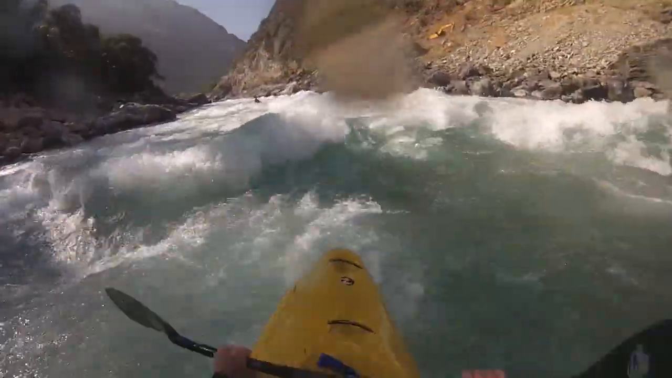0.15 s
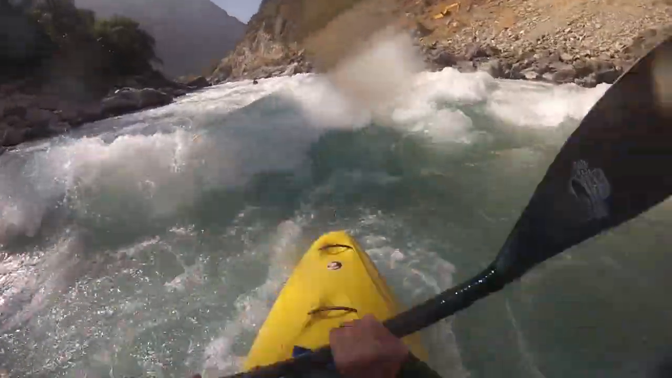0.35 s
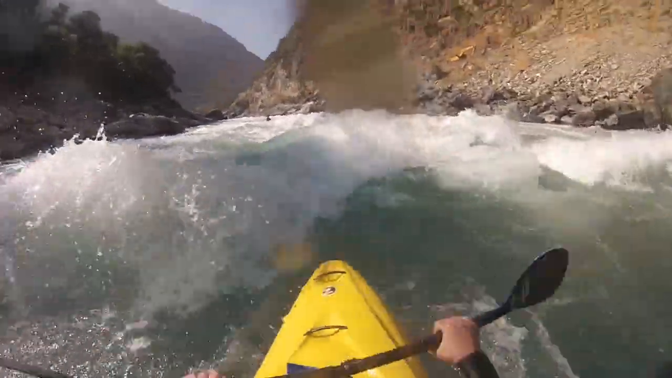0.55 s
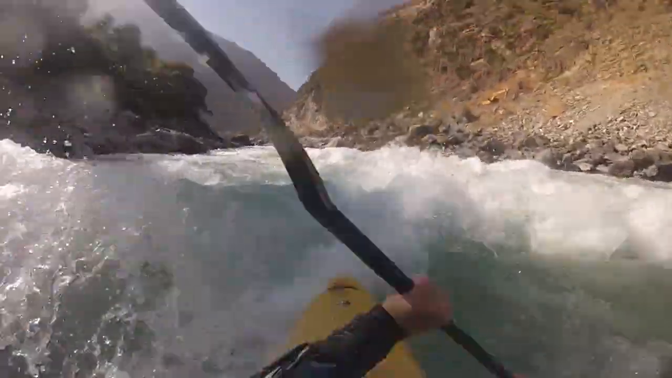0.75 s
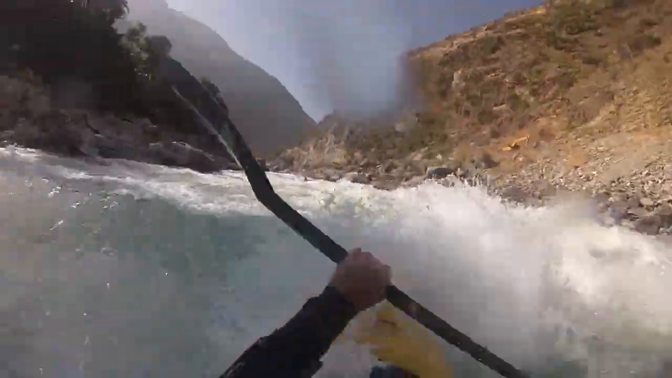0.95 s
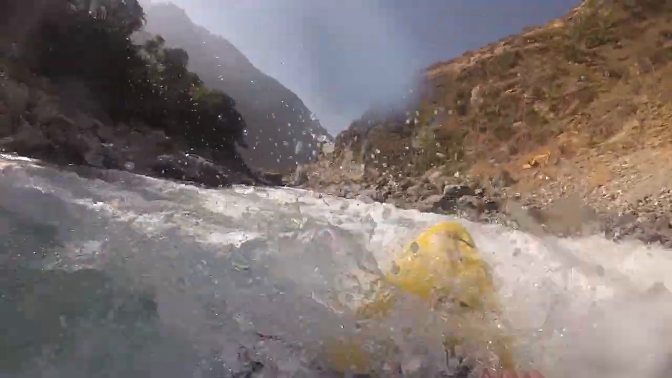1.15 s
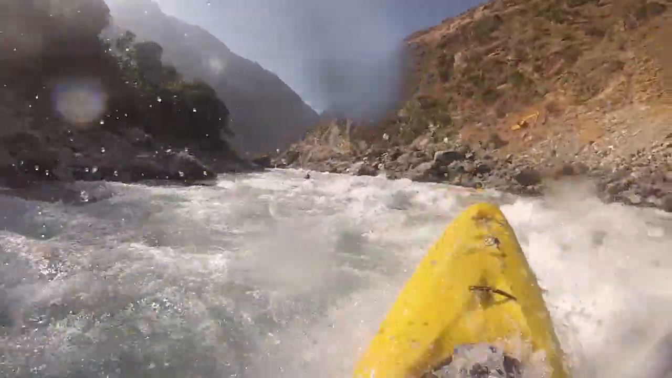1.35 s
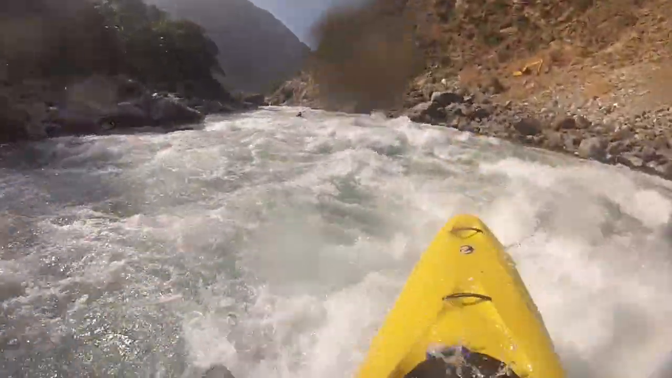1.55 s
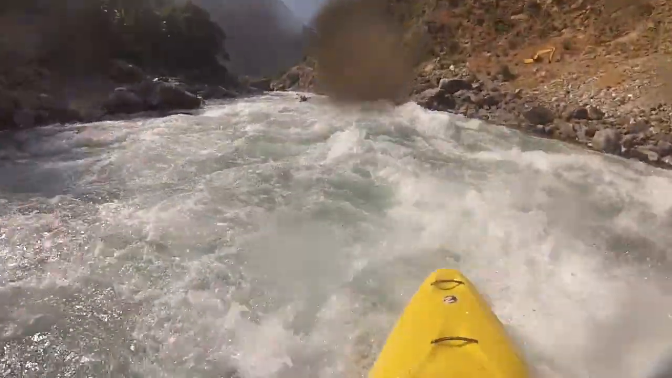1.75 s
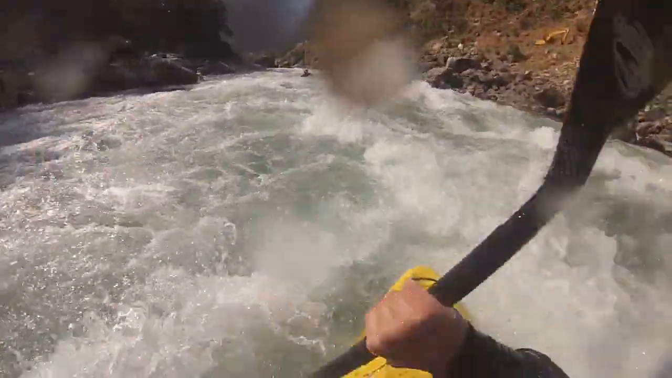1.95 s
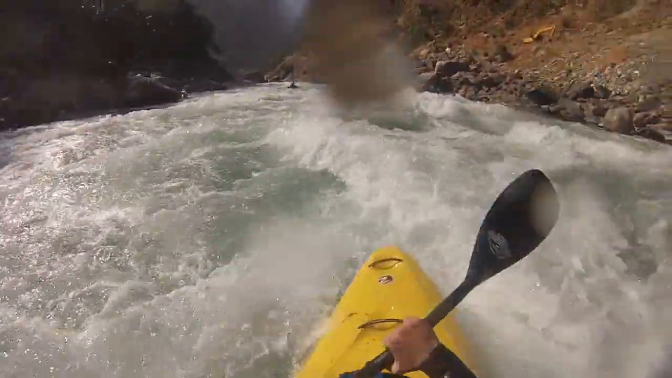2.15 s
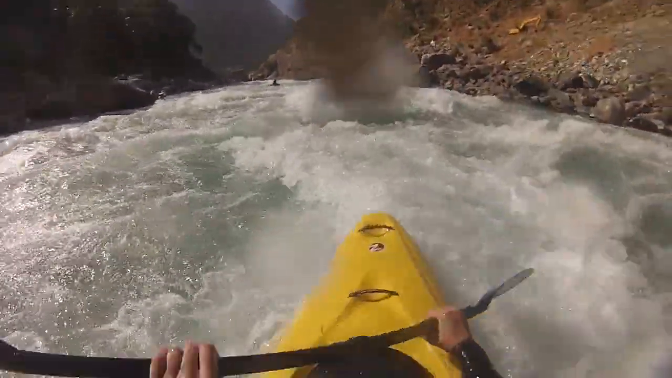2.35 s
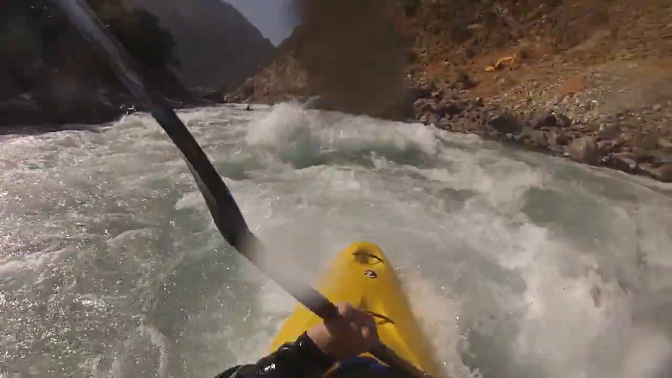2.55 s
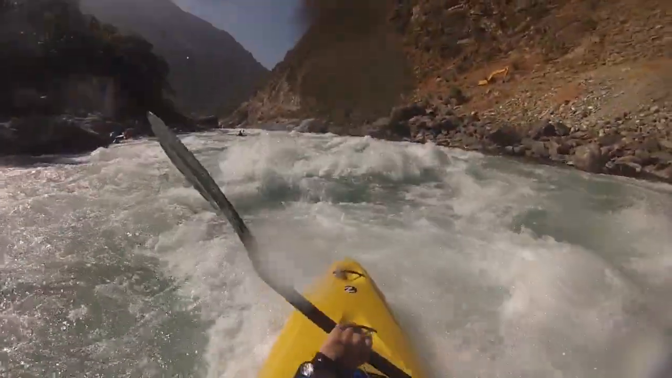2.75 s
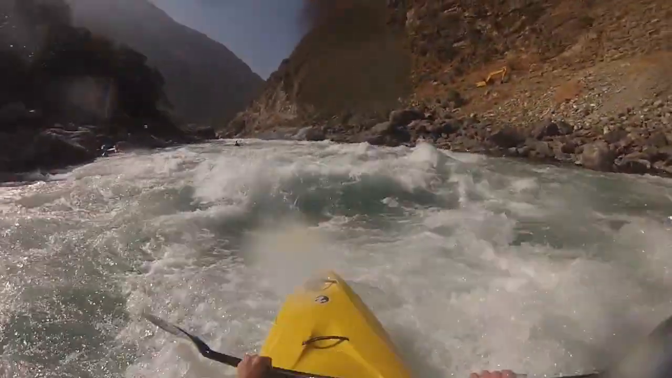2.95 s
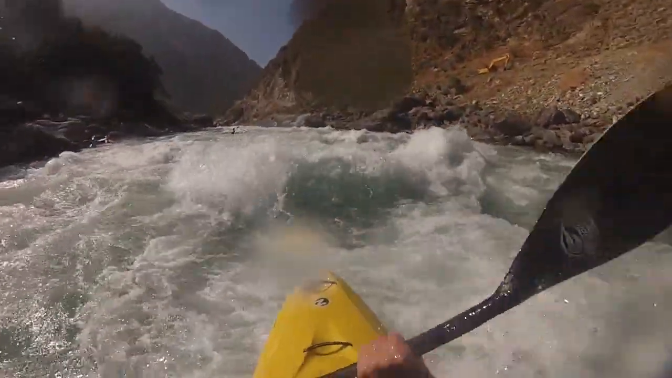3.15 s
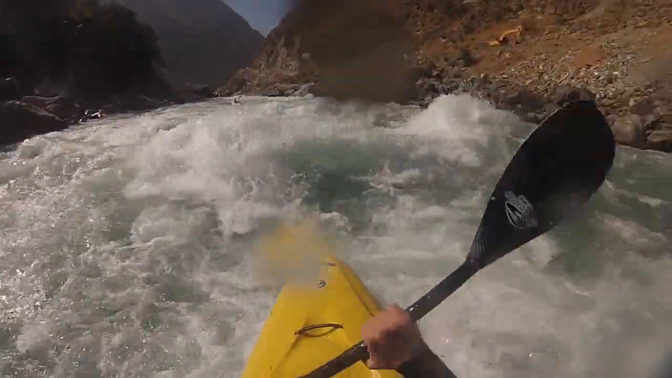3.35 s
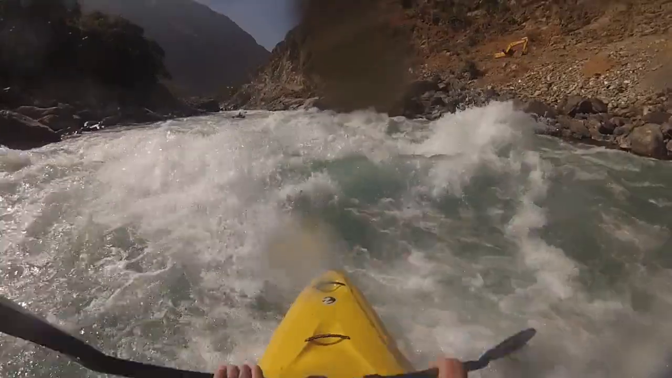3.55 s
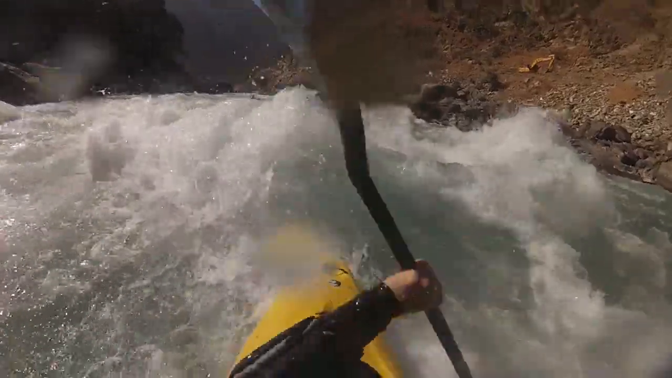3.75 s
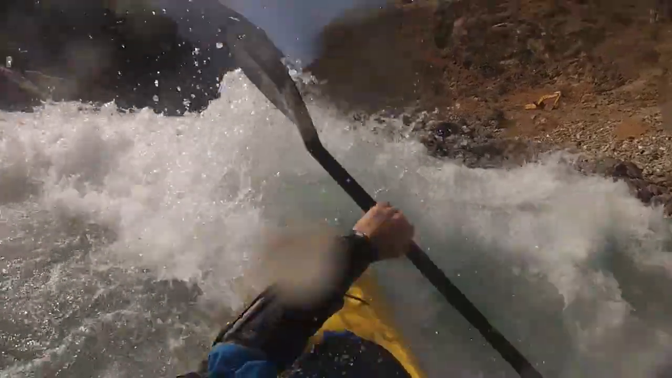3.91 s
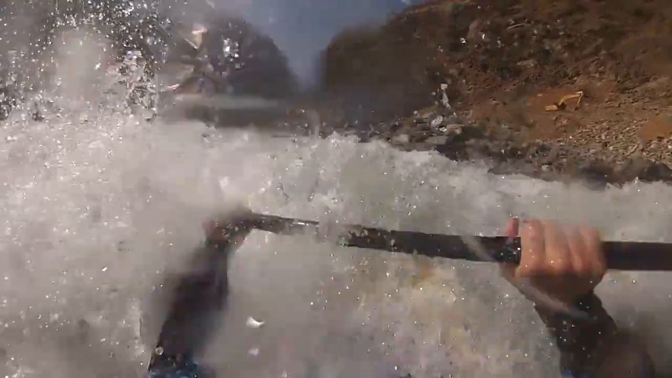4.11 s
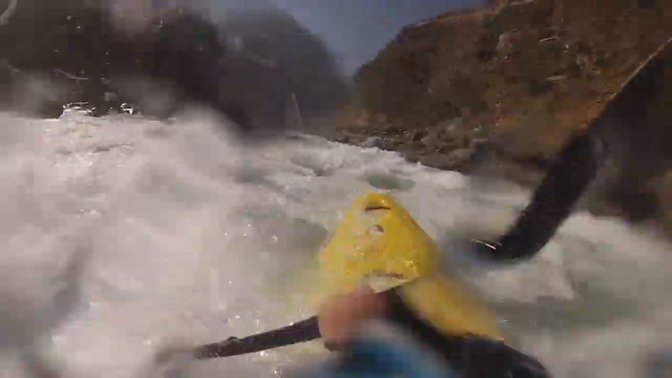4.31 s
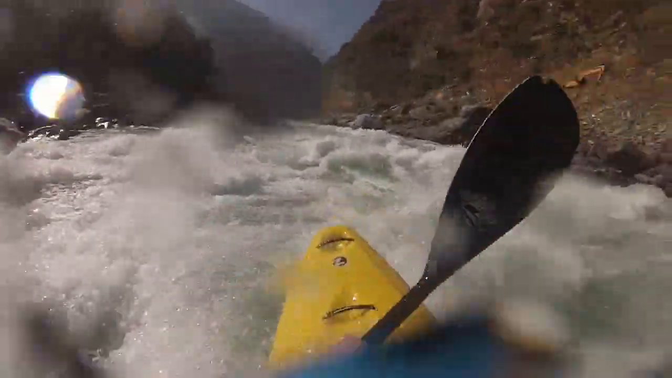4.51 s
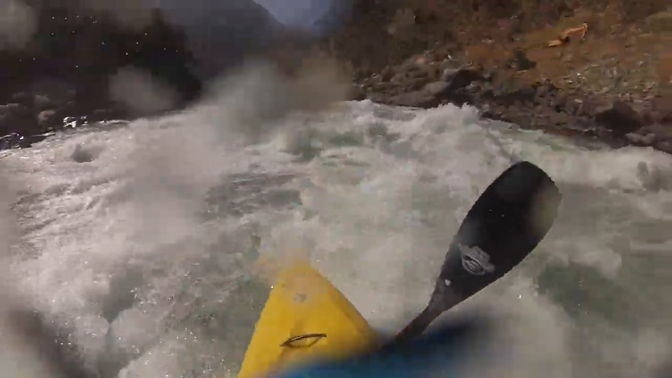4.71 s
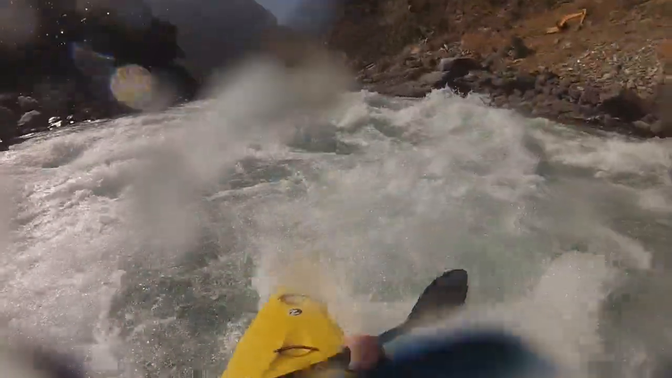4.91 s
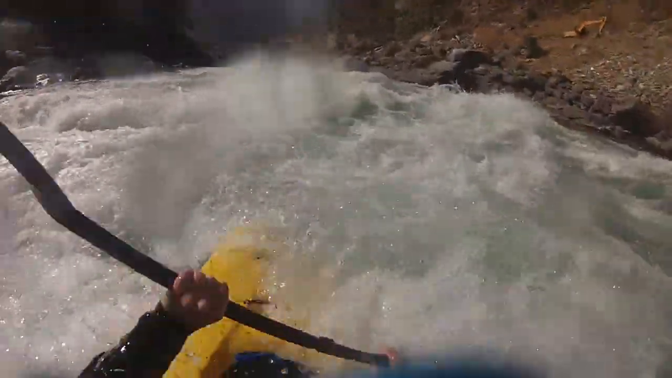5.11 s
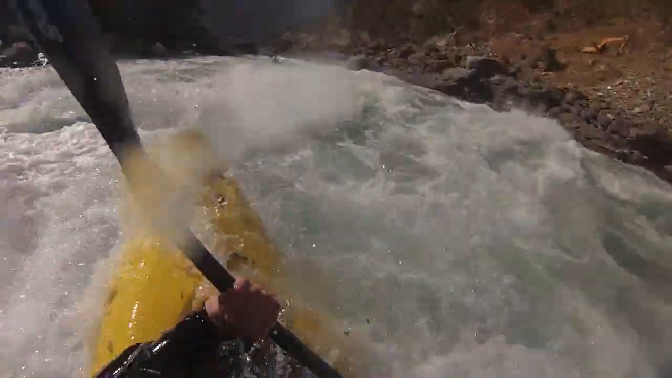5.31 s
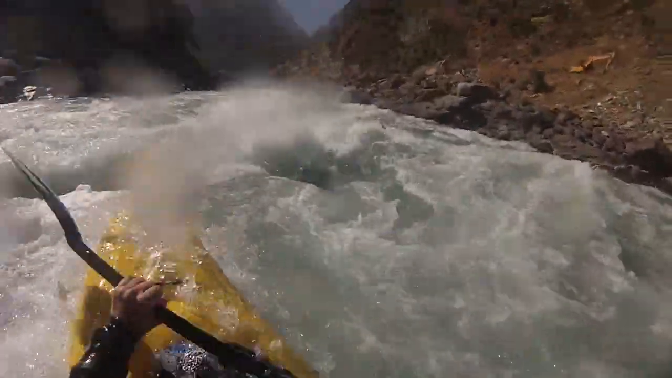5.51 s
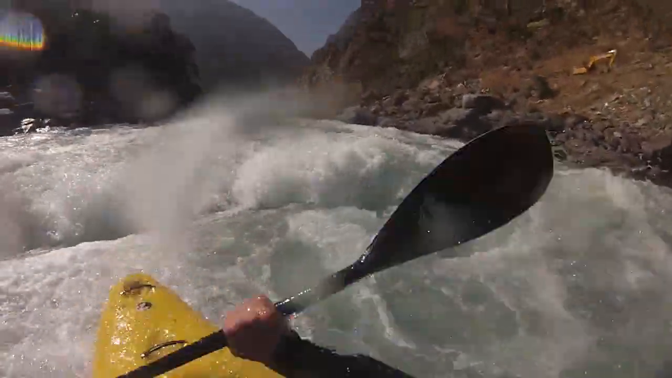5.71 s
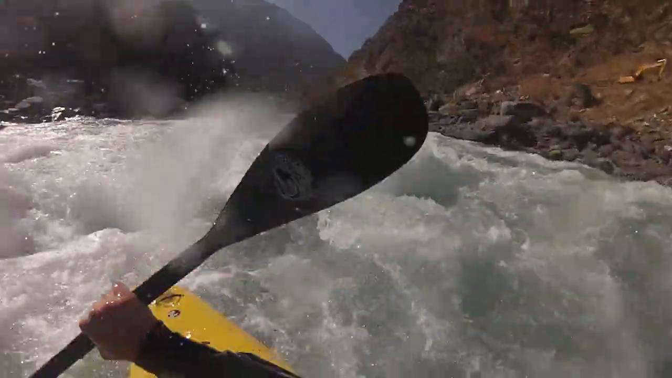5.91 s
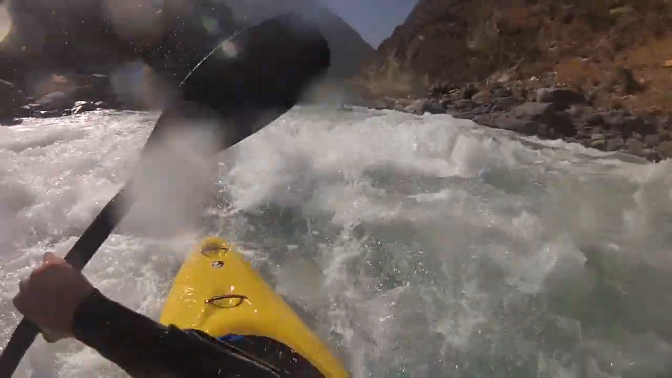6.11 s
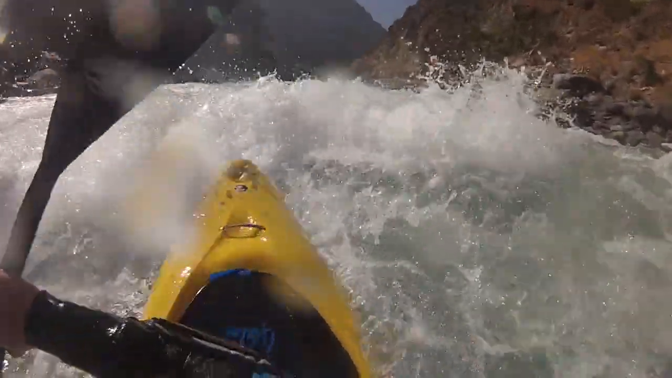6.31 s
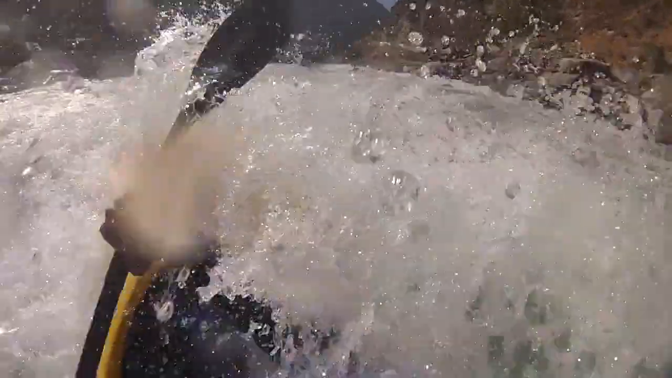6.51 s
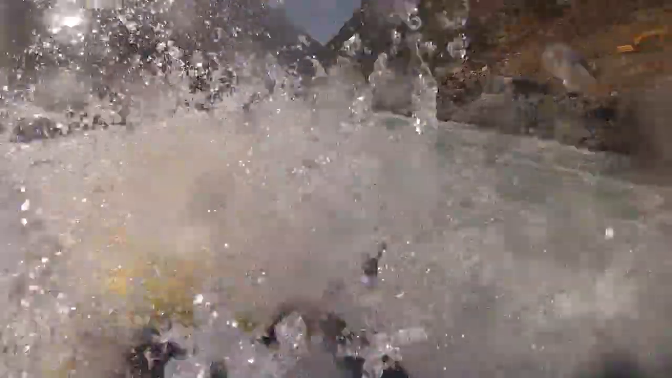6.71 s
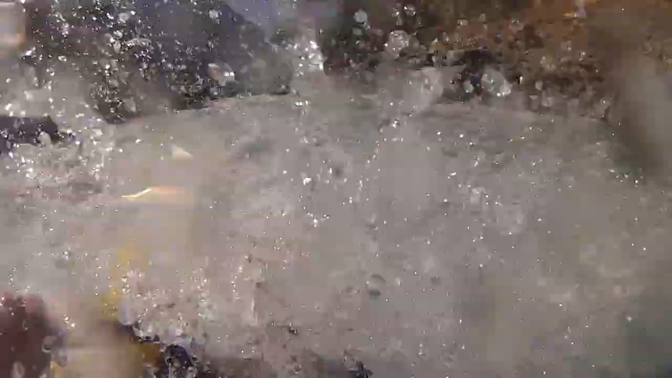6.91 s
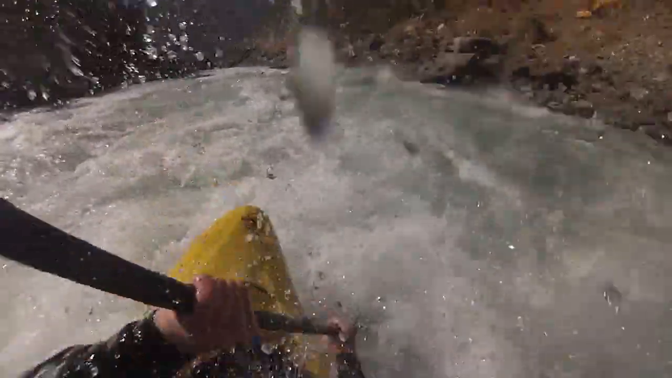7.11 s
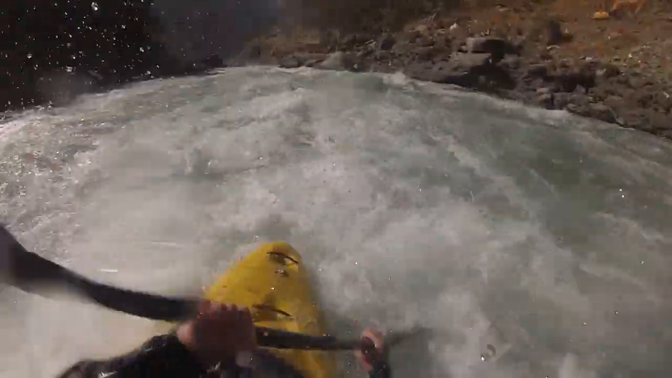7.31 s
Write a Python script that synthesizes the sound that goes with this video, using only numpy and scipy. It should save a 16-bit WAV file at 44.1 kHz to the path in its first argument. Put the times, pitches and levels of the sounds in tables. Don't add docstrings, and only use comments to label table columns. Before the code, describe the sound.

Continuous rushing river with hissing foam and gurgling churn, coloured by the hollow resonance of a waterproof case. Stray drops tick on the plastic shell early on; a wave slaps hard just after four seconds with rattling clacks. After a calmer stretch, bigger hits at six and a half and seven seconds boom against the helmet and crackle with spray, then the roar eases. Close, almost centred, outdoors in a gorge.

```python
import sys
import numpy as np
from scipy import signal
from scipy.fft import rfft, irfft, next_fast_len
from scipy.io import wavfile
from scipy.ndimage import uniform_filter1d

SR = 44100
rng = np.random.default_rng(int(sys.argv[2]) if len(sys.argv) > 2 else 0)


def transcribe(signal):
    frames = np.atleast_2d(signal).T
    limited = np.clip(frames, -1, 1)
    pcm = np.round(limited * 32767).astype(np.int16)
    wavfile.write(sys.argv[1], SR, pcm)


def how_loud(loudness_db):
    steps = np.asarray(loudness_db, float) / 20
    return 10 ** steps


N = 328986

# [t/s, nearness of breaking crests/dB, churn of aerated water under the hull/dB]
WATER_MOODS = [(0.1, -4.5, -4.5), (0.95, 7, 1), (1.2, 3, 4.5), (2.08, -1, 2.5), (2.51, -2, -1.5),
               (3.16, -3.5, -2.5), (3.45, 0, -2), (3.74, -1, -5), (4.07, 4, 1.5), (4.2, 12, 7),
               (4.4, 2, 2.5), (5.0, -1.5, 0), (5.3, 0.5, 2), (5.6, -2, -2), (6.19, 0, 0.5), (6.56, 6.5, 3),
               (6.72, 3, 2), (7.46, -2, -1)]


def rms_one(x):
    return x / np.sqrt(np.mean(x ** 2) + 1e-20)


def band(x, low_hz, high_hz, order=2):
    return signal.sosfilt(signal.butter(order, [low_hz, high_hz], "band", fs=SR, output="sos"), x)


def add(out, s, piece):
    at = round(s * SR)
    out[at:at + len(piece)] += piece[:N - at]


def water_moods():
    s, crest_db, churn_db = np.transpose(WATER_MOODS)
    t = np.arange(N) / SR
    return np.interp(t, s, crest_db), np.interp(t, s, churn_db)


def drift(rate):
    r = np.exp(-80 * np.pi * rate / SR)
    slow = signal.lfilter([1], [1, -2 * r, r * r], rng.standard_normal(N // 40 + 2002))[2000:]
    return np.interp(np.arange(N) / 40, np.arange(len(slow)), rms_one(slow))


def swell(s, hold, db, rise_db_per_s, fall_db_per_s):
    t = np.arange(N) / SR
    return db - rise_db_per_s * np.maximum(s - t, 0) - fall_db_per_s * np.maximum(t - s - hold, 0)


def ring(push, hz, t60):
    r, w = how_loud(-60 / (t60 * SR)), 2 * np.pi * hz / SR
    return signal.lfilter([0, np.sin(w)], [1, -2 * r * np.cos(w), r * r], push)


def grains(per_s, spread_db):
    sizes = how_loud(spread_db * np.minimum(rng.exponential(1, N), 5))
    signs = rng.choice([-1, 1], N)
    return rms_one(sizes * signs * (rng.random(N) < per_s / SR))


def case_db(hz):
    # [f/Hz, width/Hz, lift/dB]
    resonances = [(1697, 470, 8.5), (2620, 170, -3), (3057, 1230, 8), (3540, 246, -5.5), (4220, 550, 7.5),
                  (5800, 190, 1.5), (6900, 600, 1.5), (8300, 370, 2), (13040, 2500, 6)]
    return sum(lift_db / (1 + np.abs(2 * (hz - centre) / width) ** 2) for centre, width, lift_db in resonances)


def river(patchy_db, fizz):
    borders_hz = (140, 800, 1450, 5000, 15300)
    # [f/Hz, level per Hz/dB]
    roar_spectrum = [(130, -6.5), (300, -5), (650, -11), (1250, -6), (3000, -10.5), (10000, -22),
                     (11800, -27), (15300, -29)]
    # [mean level/dB, share of crest (dB per dB), share of churn (dB per dB)]
    river_layers = [
        (-64.5, 0.46, 0.31),
        (-62.5, 0.05, 0.99),
        (-57, 0.573, 0.18),
        (-67, 1, 0.05),
    ]
    size = next_fast_len(N, True)
    hz = np.arange(size // 2 + 1) * SR / size + 1
    roar_hz, roar_db = np.transpose(roar_spectrum)
    colour = how_loud(np.interp(np.log(hz), np.log(roar_hz), roar_db) + case_db(hz))
    foam = grains(2500, spread_db=3.5)
    water = colour * rfft(rng.standard_normal(N) + fizz * foam, size)
    out, together = np.zeros(N), drift(3.5)
    crest_db, churn_db = water_moods()
    for low, high, (db, of_crest, of_churn) in zip(borders_hz, borders_hz[1:], river_layers):
        thirds = np.geomspace(low, high, round(3 * np.log2(high / low)) + 1)
        layer = np.zeros(N)
        for a, b in zip(thirds, thirds[1:]):
            part = irfft(water * (hz >= a) * (hz < b), size)[:N]
            layer += part * how_loud(patchy_db * (0.22 * together + drift(9.8)))
        out += how_loud(db + of_crest * crest_db + of_churn * churn_db) * rms_one(layer)
    return out


def all_drops():
    # [t/s, peak/dB, ring of the spot hit f/Hz, crack/dB, blow/dB]
    stray_drops = [(1.0723, -31, 2200, -49, -8), (1.1118, -36.5, 2000, -51, -11),
                   (1.138, -39, 1320, -62, -5.5), (1.289, -40, 3500, -52, 0), (1.329, -23, 2005, -44, 21.5),
                   (1.5087, -34.5, 2820, -59, 0), (3.7114, -31, 2240, -51, 8.5),
                   (3.978, -37, 2810, -42.5, 6), (4.2751, -33.5, 1490, -55.5, 4),
                   (4.3277, -35, 1830, -50.5, -11), (4.3704, -41, 1610, -54, -8),
                   (4.3823, -33, 2320, -59, -2.5), (5.405, -60, 3000, -56.5, 0),
                   (5.7845, -47, 1210, -47, -7), (5.987, -36, 2850, -68, 1), (6.469, -37, 2140, -64, -12.5),
                   (6.7192, -39, 1540, -55, -3.5), (6.8901, -38, 3070, -65, -7),
                   (6.916, -33, 2730, -47.5, -3), (6.963, -30, 2197, -50, 20),
                   (7.0046, -34, 1700, -60.5, -1), (7.197, -38, 2740, -59, -4.5),
                   (7.214, -37.5, 1420, -65, -2), (7.3117, -34, 2790, -62, 11)]
    # [t/s, peak/dB, ring f/Hz, crack/dB, contact/ms]
    wave_lumps = [(4.1211, -33, 1990, -54, 4.7), (4.13, -29, 2340, -48, 4.9),
                  (4.1504, -28, 1980, -45, 2.2), (4.158, -21.5, 2810, -38, 4.1),
                  (4.168, -18.5, 2260, -36.5, 2.8), (4.182, -22, 1780, -28, 1.5),
                  (4.1887, -24, 2990, -44.5, 1.5), (4.191, -25, 2830, -54, 4.1),
                  (4.1992, -29, 2100, -49, 6.6), (4.208, -35, 3000, -50, 2.1),
                  (4.229, -12.5, 2050, -44, 1.4), (4.2292, -8, 3000, -51.5, 2.1),
                  (4.2365, -30, 2170, -42, 2.9), (4.2407, -25, 2720, -41, 2.9),
                  (4.2452, -26.5, 2400, -47, 6.1), (4.255, -24.5, 1700, -57, 1.7),
                  (6.5734, -26.5, 2410, -60, 4.9), (6.583, -23, 2570, -46, 3.5),
                  (6.586, -29, 2480, -38, 1.5), (6.588, -19.5, 2300, -45, 7.2),
                  (6.5923, -8.5, 2120, -18.5, 3.2), (6.5927, -7.5, 4100, -41, 2),
                  (6.602, -13, 2410, -28.5, 10.13), (6.624, -29, 1700, -50, 3.7),
                  (6.626, -23, 3000, -47, 1.5), (6.6438, -22, 1700, -42, 1.8),
                  (6.6529, -25.5, 1520, -38, 5.4), (6.672, -32, 4100, -39, 3), (6.679, -28.5, 2700, -53, 9),
                  (6.6871, -38, 990, -59, 4.3), (6.9684, -34, 1690, -58, 5.2),
                  (7.0179, -9.5, 3080, -28.5, 7.4), (7.021, -15.5, 5520, -42, 6),
                  (7.0449, -22, 2900, -54, 19), (7.049, -19, 1770, -49, 9.9),
                  (7.0668, -28, 2900, -59.5, 4.7), (7.0705, -36, 3000, -50.5, 2.1)]
    contact_ms, blow_loss_db_per_ms = 4.2, 1.1
    strays = [(s, db, hz, crack_db, contact_ms, blow_db) for s, db, hz, crack_db, blow_db in stray_drops]
    lumps = [(*row, -blow_loss_db_per_ms * row[-1]) for row in wave_lumps]
    return strays + lumps


def drops(spot_db, reach_db, knock_db):
    # [f/Hz, level/dB, t60/s]
    shell_modes = [(1190, 27.5, 0.0017), (1700, -16, 0.011), (2050, -4, 0.0284), (2464, -8, 0.044),
                   (2890, 15.5, 0.0048), (3500, 13, 0.0034), (4080, 2, 0.0088)]
    out, t = np.zeros(N), np.arange(2600) / SR
    blow = -np.exp(-((t - 0.0003) / 0.00007) ** 2)
    thud = np.exp(-((t - 0.0004) / 0.0002) ** 2) / 15
    for s, peak_db, hz, crack_db, contact_ms, blow_db in all_drops():
        fade = np.exp(-(t / (0.0006 * contact_ms)) ** 3.4) * np.minimum(t / 0.00031, 1)
        push = rng.standard_normal(len(t)) * fade + how_loud(13.5 + blow_db) * blow
        body = how_loud(spot_db) * ring(push, hz, 30 / hz)
        for f, db, t60 in shell_modes:
            body += how_loud(db - reach_db * np.log2(f / hz) ** 2) * ring(push, f, t60)
        body = band(band(body, 600, 5400), 0.61 * hz, 2.4 * hz)
        knock = how_loud(knock_db + 0.55 * blow_db) * ring(thud, 340, 0.005)
        snap_fade = np.exp(-t / (0.0004 * contact_ms)) * np.minimum(t / 0.0001, 1)
        snap = rng.standard_normal(len(t)) * snap_fade
        tints_hz = np.clip(9000 * 2 ** (0.39 * rng.standard_normal(3)), 5200, 14500)
        tinted = sum(band(snap, 0.74 * f, 1.037 * f) for f in tints_hz)
        crack = band(band(snap, 3600, 18000) + 1.1 * tinted, 3700, 12600)
        add(out, s, how_loud(peak_db) * (body / np.abs(body).max() - knock) + how_loud(crack_db) * crack)
    return out


def fine_rings(per_s, low_hz, high_hz, cycles, spread_db):
    hits, dealt = grains(per_s, spread_db), rng.integers(0, 10, N)
    out = np.zeros(N)
    for k, hz in enumerate(np.geomspace(low_hz, high_hz, 10)):
        struck = hits * (dealt == k) + 1e-18
        out += how_loud(0.25 * case_db(hz)) * ring(struck, hz, cycles / hz)
    return rms_one(out)


def spray():
    # [t/s, hold/s, patter/dB, brightness/dB]
    sheets = [(0.994, 0.15, -53, -8), (4.05, 0.38, -58.5, -5.5), (4.147, 0.05, -56, -23),
              (4.2, 0.06, -52, -21.5), (6.572, 0.019, -39, -18), (6.59, 0.014, -48, 3.5),
              (6.613, 0.012, -35, -12.5), (6.644, 0.019, -46.5, -15), (6.675, 0.01, -46, -8),
              (7.018, 0.0049, -33, -0.5), (7.029, 0.042, -49.5, -3.5), (7.043, 0.014, -37.5, -18),
              (7.059, 0.013, -53, -28)]
    patter = fine_rings(3500, 1194, 3790, cycles=26, spread_db=1.5)
    crackle = fine_rings(9000, 5000, 14000, cycles=20, spread_db=4)
    out = np.zeros(N)
    for s, hold, db, bright_db in sheets:
        gain = how_loud(swell(s, hold, db, rise_db_per_s=6000, fall_db_per_s=2200))
        out += gain * (patter + how_loud(bright_db) * crackle)
    return out


def slaps():
    # [t/s, peak/dB, boom f/Hz, t60/s]
    helmet_slaps = [(.8, -50, 88.5, 0.26), (1.058, -36, 89, 0.142), (1.06, -45, 200, 0.047),
                    (1.097, -41.5, 91, 0.103), (1.111, -41.5, 122, 0.074), (1.33, -45, 125, 0.073),
                    (2.27, -53, 90, 0.15), (3.107, -51, 95, 0.07), (3.976, -53.5, 105, 0.11),
                    (4.143, -32, 150, 0.019), (4.167, -32, 205, 0.0086), (4.222, -44.5, 136, 0.2),
                    (4.246, -42, 212, 0.046), (4.33, -48, 90, .15), (4.39, -50.5, 85, 0.167),
                    (5.9, -56, 85, .15), (6.52, -40, 55, 0.068), (6.591, -32, 174, 0.1),
                    (6.601, -33, 303, 0.063), (6.622, -27, 101, 0.072), (6.627, -30, 250, 0.014),
                    (6.644, -21.5, 106.7, 0.099), (6.643, -31, 275, 0.036), (6.684, -47, 378, .03),
                    (7.047, -42.5, 232, .03), (6.961, -46, 111, .1), (7.016, -24.5, 310, 0.0151),
                    (7.026, -24, 73.7, 0.157), (7.047, -26, 74.8, 0.15)]
    out = np.zeros(N)
    for s, peak_db, hz, t60 in helmet_slaps:
        push = np.zeros(round(t60 * SR))
        contact = round(0.35 * SR / hz)
        push[:contact] = -np.hanning(contact)
        boom = ring(push, hz, t60)
        add(out, s, how_loud(peak_db) * boom / np.abs(boom).max())
    return band(out, 60.9, 770)


def heave():
    # [t/s, swing/dB]
    lurches = [(0.06, -70), (0.62, -66), (0.81, -51.5), (0.95, -60), (1.1, -52), (1.35, -60), (2.15, -60),
               (2.37, -62.5), (2.8, -61), (3.24, -62), (3.74, -52), (3.97, -56), (4.33, -52), (4.61, -59),
               (5.15, -59), (5.38, -55), (5.55, -62), (5.96, -53), (6.28, -61.5), (6.5, -60), (6.65, -58),
               (7.08, -52), (7.29, -62.5)]
    calm_db = -70.5
    swing_db = np.full(N, calm_db)
    for s, db in lurches:
        swing_db = np.maximum(swing_db, swell(s, 0, db, rise_db_per_s=128, fall_db_per_s=138.5))
    crest_db, _ = water_moods()
    rumble_db = -72 + 0.66 * crest_db + 0.2 * (swing_db - calm_db) + 2.6 * drift(8)
    swings = band(band(rng.standard_normal(N), 4.3, 28), 4.3, 28)
    rumble = band(band(rng.standard_normal(N), 47, 140), 47, 140)
    return how_loud(swing_db) * rms_one(swings) + how_loud(rumble_db) * rms_one(rumble)


def scene():
    ear = river(patchy_db=1.12, fizz=0.59) + drops(spot_db=7.5, reach_db=20.5, knock_db=-18)
    ear = ear + spray() + slaps() + heave()
    return np.stack([ear, ear])


def wide_patches():
    # [t/s, length/s, from f/Hz]
    broad_patches = [
        (1.325, .015, 5200),
        (4.148, .033, 4200),
        (4.181, .022, 6000),
        (4.225, .009, 5200),
        (6.59, .01, 6500),
        (6.612, .072, 7600),
        (6.945, .025, 5500),
    ]
    count, length_s, width_hz, bottom_hz, top_hz = 20, 0.035, 1500, 4500, 15300
    starts = rng.random(count) * (N / SR - length_s)
    lows = bottom_hz + (top_hz - width_hz - bottom_hz) * rng.random(count)
    scattered = [(s, length_s, low, low + width_hz) for s, low in zip(starts, lows)]
    return [(*row, top_hz) for row in broad_patches] + scattered


def side_noise(mono):
    side = np.zeros(N)
    for s, length, low, high in wide_patches():
        piece = band(mono[round(s * SR):round((s + length) * SR)], low, high, order=8)
        level = np.sqrt(np.abs(uniform_filter1d(piece ** 2, size=130)))
        noise = rms_one(band(rng.standard_normal(len(piece)), low, high, order=8))
        add(side, s, how_loud(-6) * level * noise * signal.windows.tukey(len(piece), 0.3))
    return side


def low_pass(x):
    return signal.sosfilt(signal.butter(12, 16450, fs=SR, output="sos"), x)


def record(dry):
    rounded = 0.7 * np.tanh(dry / 0.7)
    dull = signal.sosfilt(signal.cheby2(12, 40, 16000, fs=SR, output="sos"), rounded)
    mix = dull + side_noise(dull[0]) * [[1], [-1]]
    return low_pass(mix)


dry = scene()
out = record(dry)
transcribe(out)
```